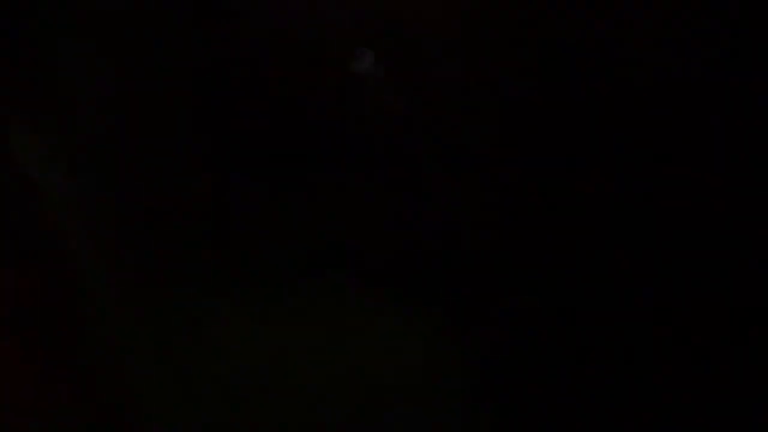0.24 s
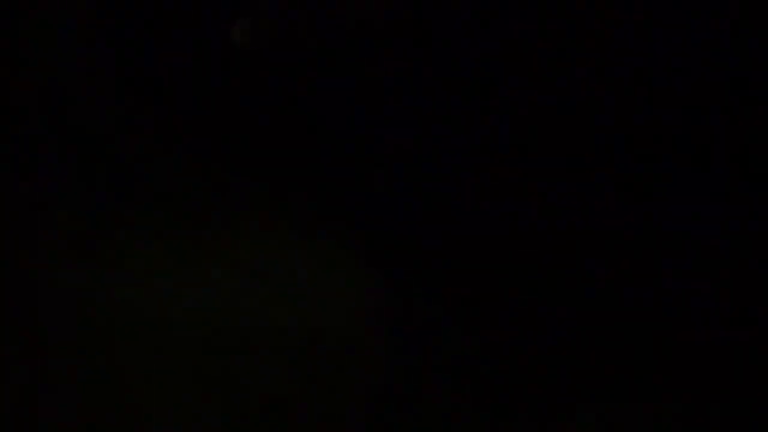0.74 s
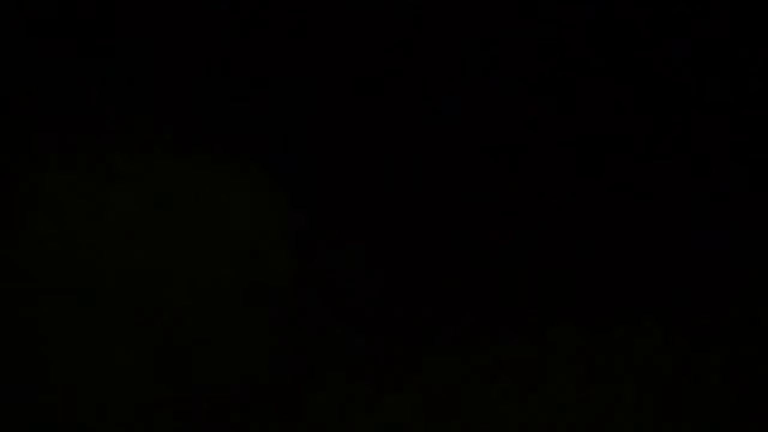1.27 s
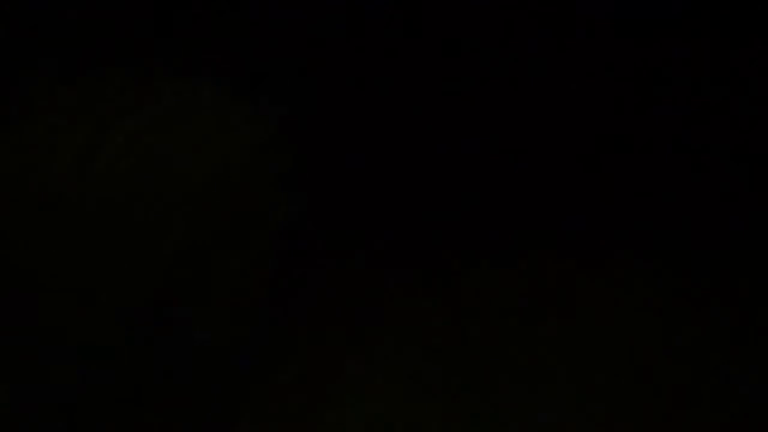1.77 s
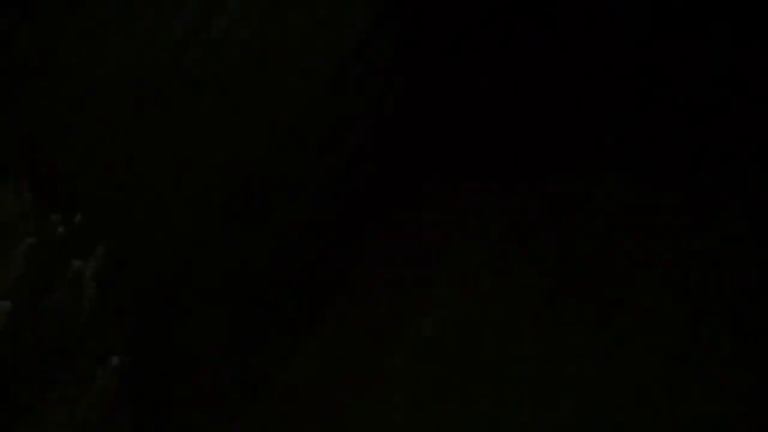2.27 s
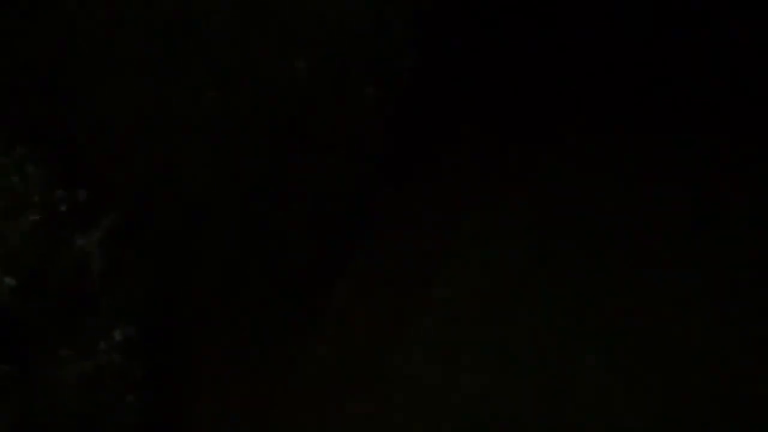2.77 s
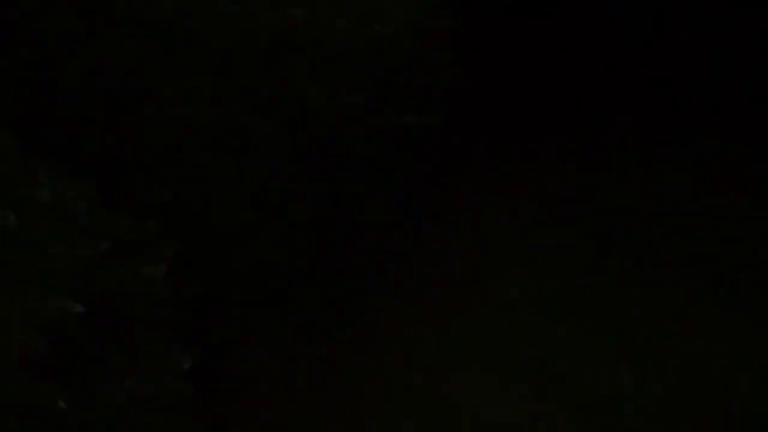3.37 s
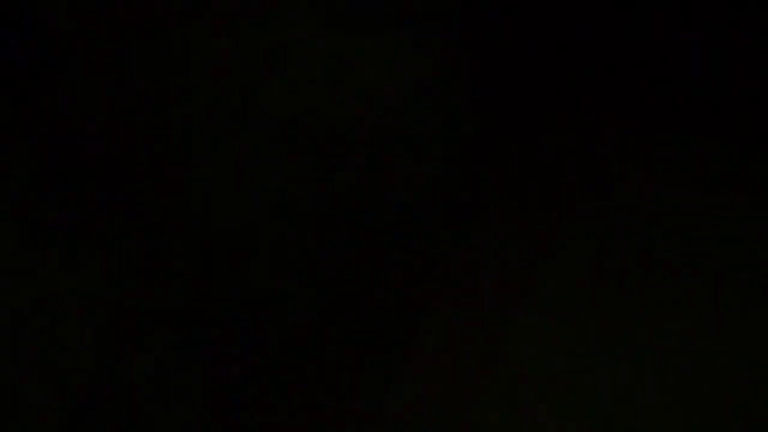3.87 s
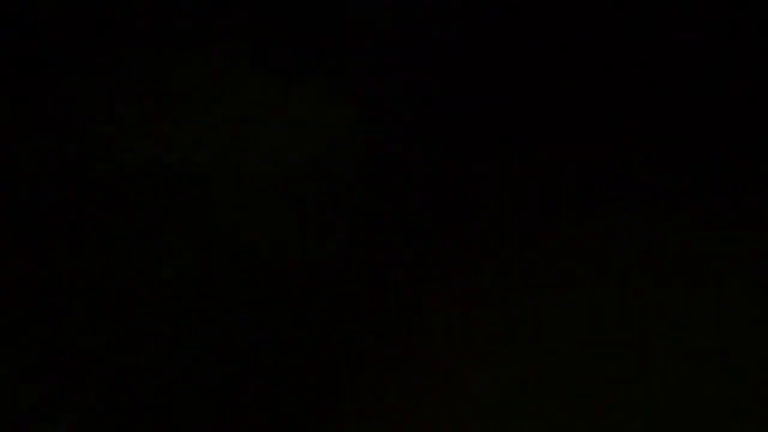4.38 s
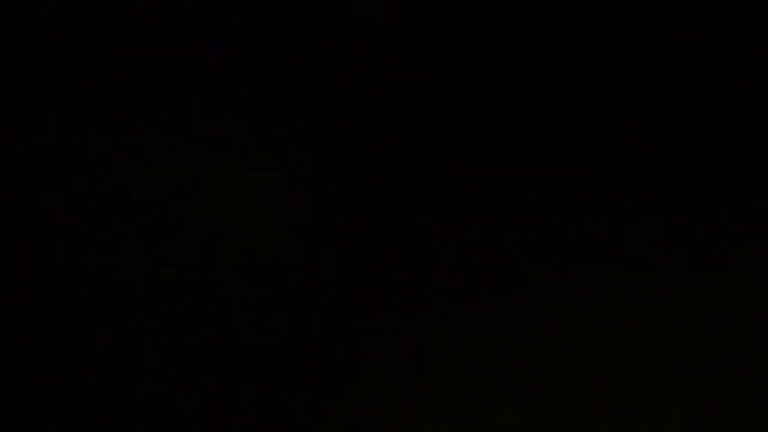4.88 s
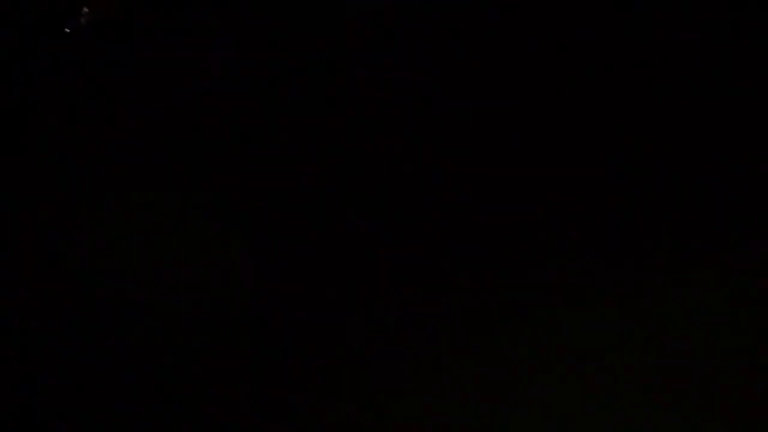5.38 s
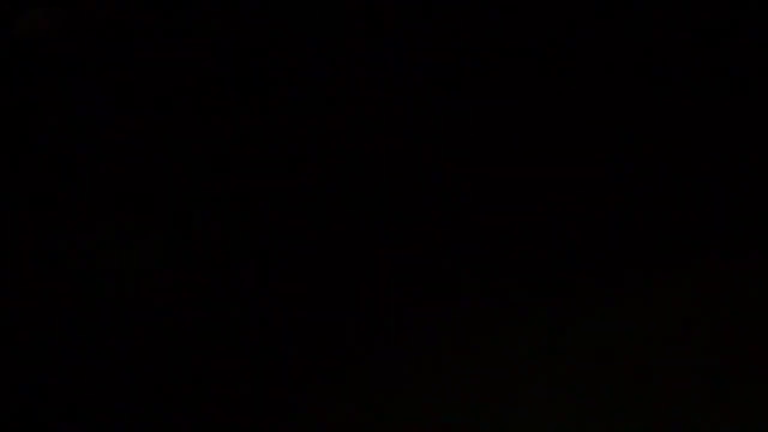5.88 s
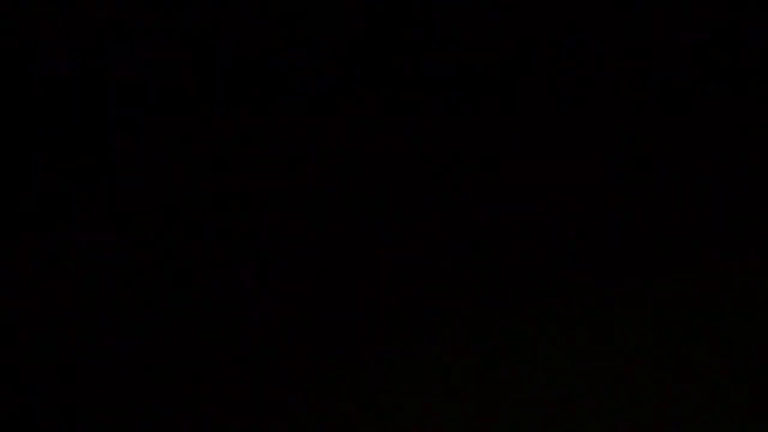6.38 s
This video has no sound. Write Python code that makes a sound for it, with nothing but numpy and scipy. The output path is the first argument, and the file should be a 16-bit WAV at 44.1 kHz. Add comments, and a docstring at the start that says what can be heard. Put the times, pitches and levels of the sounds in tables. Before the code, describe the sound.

Outdoors at night, sleet falls as a bright, wide hiss made of countless tiny pellets. Nearer pellets patter crisply on leaves and ground, and a few tick sharply right beside the microphone. The fall thickens gently toward the middle, then eases. A low motor hum throbs slowly underneath with soft distant rumble, and a few muffled bumps touch the microphone early on.

```python
"""Sleet falls outdoors at night, swelling once and easing off: far pellets merge into a hiss of coloured
noise; nearer ones patter on leaves and ground, and a few tick sharply beside the microphone. Each such
impact is a short burst of damped modes. A motor hums in sine lines that beat against the mains.
Low noise rumbles underneath, and a few soft bumps on the microphone are puffs of band-passed noise."""
import sys
import numpy as np
from scipy import signal
from scipy.fft import rfft, irfft
from scipy.io import wavfile

SR = 44100
rng = np.random.default_rng(int(sys.argv[2]) if len(sys.argv) > 2 else 0)


def inscribe(sig):
    """Save sig as 16-bit PCM at rate SR to the path in sys.argv[1].

    A 1-D sig is mono; a 2-D sig holds one channel per row.
    Samples are clipped to [-1, 1] before scaling.
    """
    pcm = np.round(np.clip(np.atleast_2d(sig).T, -1, 1) * 32767)
    wavfile.write(sys.argv[1], SR, pcm.astype(np.int16))


N = 292824
TIME_S = np.arange(N) / SR
FREQS_HZ = np.fft.rfftfreq(N, 1 / SR)

# Distant rumble. Each row: frequency in Hz, relative density in dB per Hz.
RUMBLE_SPECTRUM = [(15, -11), (30, -6), (55, -6), (85, -1), (130, -2.1), (200, 0), (300, -3), (450, -5),
                   (700, -6), (1100, -10.5), (2500, -23)]
# Left-right likeness of the rumble. Each row: frequency in Hz, correlation (0 to 1).
RUMBLE_LIKENESS = [(30, 1), (150, 0.96), (400, 0.81), (1100, 0.67)]
# Hum lines of the motor shaft. Each row: multiple of the shaft rate, rms level in dB before wander.
SHAFT_LINES = [(2, -71), (4, -46.5), (6, -62.5), (11, -60.5)]
# Hum lines of the mains. Each row: multiple of the mains rate, rms level in dB before wander.
MAINS_LINES = [(2, -59), (4, -51.5), (6, -59.5), (10, -59.5)]
# Soft bumps on the microphone. Each row: centre in seconds, level in dB, half length (to 1/e) in seconds.
MIC_BUMPS = [(.01, -37.5, 0.034), (.18, -48, 0.067), (0.613, -41.5, 0.052), (1.637, -38, 0.012),
             (1.907, -43, .02), (2.048, -44, .05), (2.31, -39, 0.024)]
# Far sleet. Each row: frequency in Hz, relative density in dB per Hz.
HISS_SPECTRUM = [(400, -22), (1000, -10), (1700, -7), (2500, -5), (3300, -3), (4300, -2.5), (5300, -3),
                 (6500, -1.5), (8100, 0.5), (9500, -1.5), (11000, -7.5)]
# Left-right likeness of the far sleet. Each row: frequency in Hz, correlation (0 to 1).
HISS_LIKENESS = [(500, 0.43), (1200, 0.62), (3000, 0.61), (4300, 0.43), (6500, 0.57), (8200, 0.8),
                 (11000, 0.88)]
# Modes of a struck spot. Each row: multiple of the main ring, level in dB before random spread.
SPOT_MODES = [(0.702, -5.5), (0.996, 1.5), (1.15, -6.5), (1.37, -7), (2.2, 1)]
# Loudest close pellets. Each row: start in seconds, relative peak in dB, main ring in Hz,
# t60 in seconds, left minus right in dB.
CLOSE_PELLETS = [(0.996, -3.5, 8340, 0.00075, 1), (1.0818, -6, 8400, 0.0011, 2),
                 (1.1178, -13, 5660, 0.0036, 2), (1.686, -9, 8700, 0.004, 4), (1.8919, -7, 8860, 0.0061, 2),
                 (2.427, -11, 8310, 0.0036, 3), (2.5115, -7.5, 6250, 0.0053, 1),
                 (2.6692, 1, 9430, 0.0016, -1), (2.6932, -6, 5200, 0.0041, 2),
                 (2.8869, -4.5, 8700, 0.002, 1), (2.962, -8, 7650, 0.004, 1),
                 (3.0137, -2.5, 9300, 0.0028, 1), (3.5034, 2.5, 7900, 0.0029, 1),
                 (3.5176, 1.5, 8750, 0.0015, 0), (3.542, -5, 3180, 0.0072, 0),
                 (3.7593, -7, 6700, 0.0034, 3), (3.991, -11, 8300, 0.004, 4),
                 (3.9981, -9, 10000, 0.0025, -1), (4.25, -8, 8950, 0.008, 3), (4.488, -10, 9400, 0.0063, 1),
                 (5.0316, -9.5, 8400, 0.005, 1), (5.127, -18.5, 3500, 0.0055, 4),
                 (5.1936, -19.5, 2880, 0.0063, 3), (6.6076, -4, 9130, 0.0034, 1.5)]

# The motor slips just behind the mains, so their fourth multiples beat.
SHAFT_HZ, MAINS_HZ, IN_STEP_S = 59.277, 59.975, .056
# The thin upper hum lines dip once and return.
WHINE_DIP_S, WHINE_DIP_HALF_S, WHINE_DIP_DB, WHINE_DB = 3.5, 1, -8, 0
# Rate of fall, in dB before each layer's own scaling.
SWELL_PEAK_S, SWELL_RISE_S, SWELL_DB, EBB_DB_PER_S = 3.56, 1.7, 2.5, 1.1
TOP_HZ = 11000


def undb(db):
    """Decibels to gain."""
    return 10 ** (np.asarray(db) / 20)


def level(x, rms_db):
    """Scale to an rms level."""
    return x * undb(rms_db) / np.sqrt(np.mean(x ** 2))


def highpass(x, cutoff_hz):
    """Steep fourth-order high-pass."""
    return signal.sosfilt(signal.butter(4, cutoff_hz, "high", fs=SR, output="sos"), x)


def over_hz(points):
    """Join (Hz, value) points on a log-frequency axis."""
    hz, value = np.transpose(points)
    return np.interp(np.log(FREQS_HZ + 1), np.log(hz), value)


def walk(rate_hz):
    """Smooth random wander, rms 1: noise under a Gaussian low-pass."""
    spectrum = rfft(rng.standard_normal(N)) * np.exp(-(FREQS_HZ / rate_hz) ** 2)
    return level(irfft(spectrum, N), 0)


def diffuse(spectrum, likeness):
    """Sound from all around: coloured noise, partly shared by left and right, rms 1."""
    mid, side = rfft(rng.standard_normal((2, N))) * undb(over_hz(spectrum))
    shared = np.clip(over_hz(likeness), 0, 1)
    mid = mid * np.sqrt(1 + shared)
    side = side * np.sqrt(1 - shared)
    return level(irfft([mid + side, mid - side], N), 0)


def distant_rumble():
    """Low diffuse noise."""
    return undb(-42.0) * diffuse(RUMBLE_SPECTRUM, RUMBLE_LIKENESS)


def whine():
    """Gain in dB of the upper hum lines: steady but for one smooth dip."""
    return WHINE_DB + WHINE_DIP_DB * np.exp(-((TIME_S - WHINE_DIP_S) / WHINE_DIP_HALF_S) ** 2)


def motor():
    """Shaft and mains lines drift in and out of step, so the hum throbs."""
    hum, whine_db = 0, whine()
    for rate_hz, lines in ((SHAFT_HZ, SHAFT_LINES), (MAINS_HZ, MAINS_LINES)):
        turns = rate_hz * (TIME_S - IN_STEP_S) + .003 * walk(3)
        for multiple, rms_db in lines:
            order = round(multiple)
            wander_db = .8 * walk(2) + whine_db * (order >= 10)
            line = level(np.cos(2 * np.pi * order * turns), rms_db)
            hum = hum + line * undb(wander_db)
    return hum


def bumps():
    """Brief low puffs on the microphone, a little different at each port."""
    band = signal.butter(2, [20, 105], "band", fs=SR, output="sos")
    shared, side = signal.sosfilt(band, rng.standard_normal((2, N)))
    low = shared + undb(-16) * np.array([side, -side])
    envelope = sum(undb(db) * np.exp(-((TIME_S - s) / half_s) ** 2) for s, db, half_s in MIC_BUMPS)
    return level(low, 0) * envelope


def impacts(start_s, peak_db, ring_hz, t60_s, pan_db, contact_s, lag_s, unevenness=0.085, samples=320):
    """Each pellet pushes briefly on a spot that rings with a few heavily damped modes."""
    count = len(start_s)
    offsets = np.arange(samples)
    # Direction sets the delay between the ports.
    lag = lag_s * rng.standard_normal((count, 1))
    port_delay_s = np.array([np.maximum(lag, 0), np.maximum(-lag, 0)])
    t = np.maximum(offsets / SR - port_delay_s, 0)
    ring = 0
    for ratio, mode_db in SPOT_MODES:
        # No two spots space or weight their modes alike.
        detune, weight_db = rng.standard_normal((count, 2)).T
        mode_hz = (ring_hz * ratio ** (1 + unevenness * detune))[:, None]
        gain = undb(mode_db + weight_db[:, None]) * (mode_hz < SR / 2)
        ring = ring + gain * np.sin(2 * np.pi * mode_hz * t)
    attack = 1 - np.exp(-t / contact_s)
    decay = np.exp(-np.log(1000) * t / t60_s[:, None])
    shape = attack * decay
    shape = shape / shape.max(axis=2, keepdims=True)
    port_db = peak_db + np.array([pan_db, -pan_db]) / 2
    ring = ring * shape * undb(port_db)[..., None]
    where = (np.round(start_s * SR).astype(int)[:, None] + offsets).ravel()
    where = np.maximum(where, 0)
    return np.array([np.bincount(where, port.ravel(), N)[:N] for port in ring])


def fall():
    """Strength of the fall in dB: a smooth rise to the peak, then a steady ebb."""
    since_s = TIME_S - SWELL_PEAK_S
    rise_db = SWELL_DB * np.exp(-(np.minimum(since_s, 0) / SWELL_RISE_S) ** 2)
    return rise_db - EBB_DB_PER_S * np.maximum(since_s, 0)


def far_hiss(swell_db):
    """Countless far pellets merge into diffuse noise whose level flickers."""
    return diffuse(HISS_SPECTRUM, HISS_LIKENESS) * undb(-31.5 + 0.33 * swell_db + 0.85 * walk(23))


def patter(centre_hz, octaves, spread_db, t60_s, pan_db, lag_s, count):
    """Pellets landing at random: many faint, few strong, each spot with its own pitch."""
    when, strength, pitch = rng.random((count, 3)).T
    damping, side = rng.standard_normal((count, 2)).T
    peak_db = -spread_db * np.log(strength + 0.07)
    ring_hz = centre_hz * 2 ** (octaves * np.arcsin(2 * pitch - 1))  # most near the centre
    hits = impacts(when * N / SR, peak_db, ring_hz, t60_s * np.exp(.3 * damping), pan_db + 1.6 * side,
                   contact_s=.00008, lag_s=lag_s, samples=220)
    return level(highpass(hits, 2220), 0)  # small spots radiate no bass


def stray_pellets(top_db, spread_db, top_hz, octaves, t60_s, pan_db, count):
    """A few pellets a step away tick faintly above the patter; some hit duller spots."""
    when, strength, dullness, side = rng.random((count, 4)).T
    start_s = (np.arange(count) + when) / count * N / SR  # one per equal slot
    peak_db = top_db - spread_db * strength
    ring_hz = top_hz * 2 ** (-octaves * dullness ** 4)
    hits = impacts(start_s, peak_db, ring_hz, np.full(count, t60_s), pan_db * 2 * side,
                   contact_s=.0001, lag_s=.000005)
    return highpass(hits, 1960)


def close_ticks():
    """Pellets within arm's reach; nearby surfaces scatter a faint, short tail."""
    hits = impacts(*np.transpose(CLOSE_PELLETS), contact_s=.0001, lag_s=.000005,
                   unevenness=0.061, samples=500)
    direct = highpass(hits, 1300)
    age_s = TIME_S[:SR // 10]
    scatter = rng.standard_normal((2, len(age_s))) * np.exp(-age_s / 0.012)
    scatter /= np.sqrt(np.sum(scatter ** 2, axis=1, keepdims=True))  # unit energy
    tail = signal.fftconvolve(direct, scatter, axes=1)[:, :N]
    return undb(-4.5) * direct + undb(-12) * tail


def sleet():
    """One rate of fall drives the far hiss and, more strongly, the patter and strays nearby."""
    fall_db = fall()
    swell_db = fall_db - fall_db.mean()
    hiss = far_hiss(swell_db)
    crisp = patter(centre_hz=8500, octaves=0.23, spread_db=4.0, t60_s=0.0046, pan_db=2.0,
                   lag_s=.000006, count=3600)
    dull = patter(centre_hz=4904, octaves=0.72, spread_db=2.5, t60_s=0.0077, pan_db=-0.5,
                  lag_s=.00002, count=1600)
    strays = stray_pellets(top_db=-14.5, spread_db=10.5, top_hz=8760, octaves=0.74, t60_s=0.0018,
                           pan_db=3.0, count=30)
    flurry = undb(1.6 * swell_db + 1.4 * walk(16))
    near = flurry * (undb(-33.0) * crisp + undb(-43.5) * dull)
    return hiss + near + undb(swell_db) * strays


def scene():
    """Sleet over the night's low background."""
    return distant_rumble() + motor() + bumps() + close_ticks() + sleet()


def record(dry):
    """The recorder cuts the top steeply."""
    return signal.sosfilt(signal.ellip(10, .2, 70, TOP_HZ, fs=SR, output="sos"), dry)


dry = scene()
out = record(dry)
inscribe(out)
```